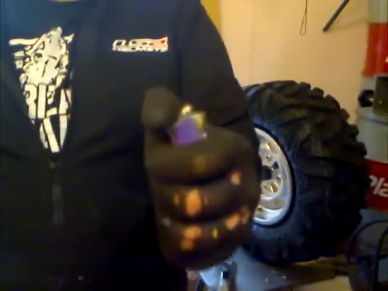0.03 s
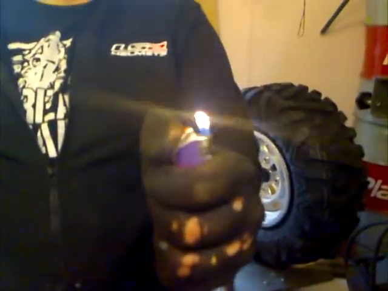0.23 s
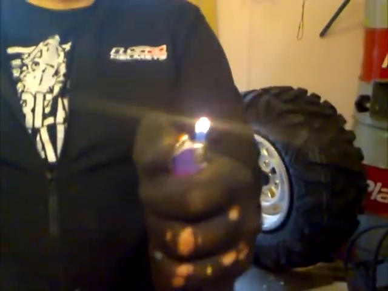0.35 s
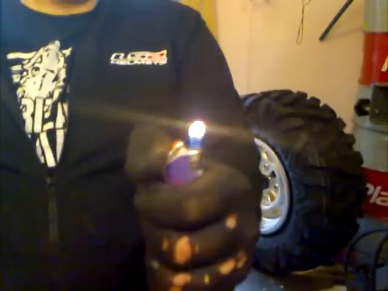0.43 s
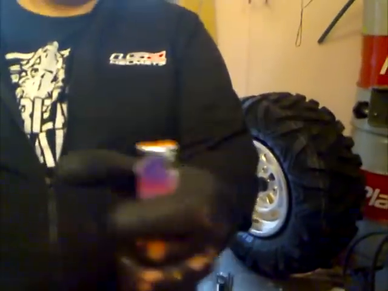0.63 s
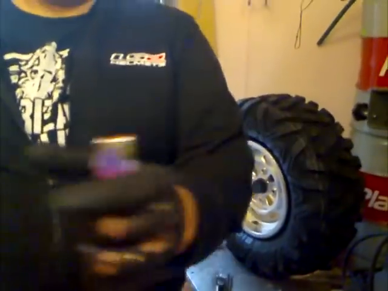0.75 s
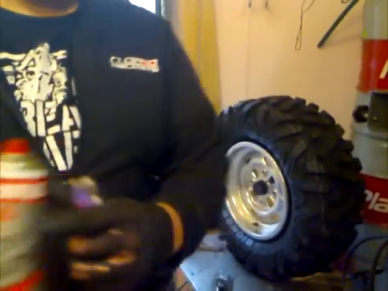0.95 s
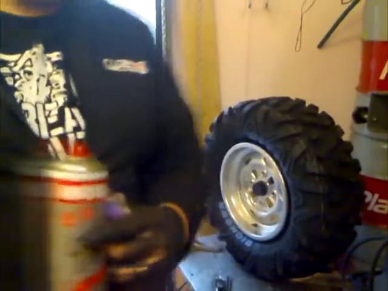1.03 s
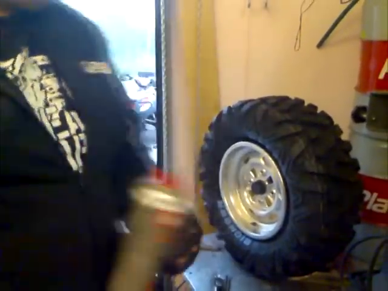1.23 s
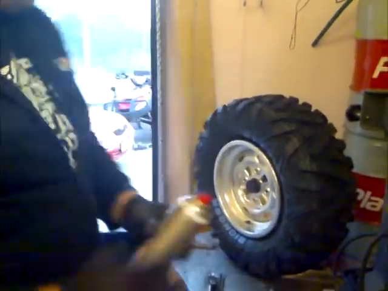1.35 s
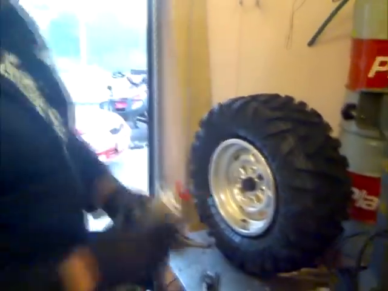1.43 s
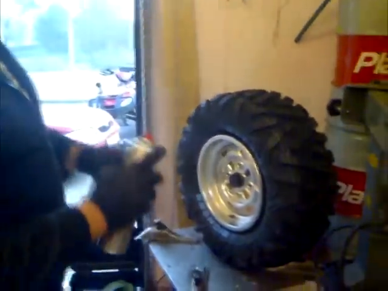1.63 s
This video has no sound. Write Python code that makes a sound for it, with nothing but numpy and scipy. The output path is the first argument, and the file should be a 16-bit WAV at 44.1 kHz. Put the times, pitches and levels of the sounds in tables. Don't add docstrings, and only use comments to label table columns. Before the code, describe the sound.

Two harsh metallic lighter snaps ring in a hard room, followed by a light can tap

```python
import sys
import numpy as np
from scipy import signal
from scipy.fft import rfft, irfft, next_fast_len
from scipy.io import wavfile
from scipy.ndimage import uniform_filter1d

SR = 44100
rng = np.random.default_rng(int(sys.argv[2]) if len(sys.argv) > 2 else 0)


def volts(x):
    e = np.asarray(x, float) / 20
    return 10 ** e


def pcm_store(signal):
    levels = np.round(np.clip(np.atleast_2d(signal), -1, 1) * 32767)
    wavfile.write(sys.argv[1], SR, levels.astype(np.int16).T)


N = 74970


def unit(x):
    return x / np.sqrt(np.mean(x ** 2) + 1e-20)


def along(points, hz):
    point_hz, value = np.transpose(points)
    return np.interp(np.log(hz + 1), np.log(point_hz + 1), value)


def filtered(x, gain):
    size = 2 * next_fast_len(N // 2 + 4096)
    cepstrum = irfft(np.log(np.abs(gain(np.fft.rfftfreq(size, 1 / SR))) + 1e-6), size)
    cepstrum[1:size // 2] *= 2
    cepstrum[size // 2 + 1:] = 0
    return irfft(rfft(x, size) * np.exp(rfft(cepstrum)), size)[:N]


def peaks(modes, hz):
    power = 0
    for center, width, db in modes:
        damping = (hz * width) ** 2
        power = power + volts(2 * db) * damping / ((center * center - hz * hz) ** 2 + damping)
    return np.sqrt(power)


def even(gain):
    return lambda hz: unit(gain(hz))


def bursts(rows, rise_s):
    t = np.arange(N) / SR
    shape = np.zeros(N)
    for start, db, t60 in rows:
        age = np.clip(t - start, 0, None)
        shape += volts(db - 60 * age / abs(t60)) * (1 - np.exp(-age / rise_s))
    return shape * rng.standard_normal(N)


# frequency_hz, t60_s
ROOM_DECAY = [(200, 3.6), (1000, 1.0), (2500, 0.5), (3900, 0.43), (5000, 0.47), (7000, 0.41), (10000, .35),
              (15000, 0.35)]


def echo():
    hz, t, z = signal.stft(rng.standard_normal(SR + SR // 2), SR, nperseg=256)
    fall_db = -60 * t / along(ROOM_DECAY, hz)[:, None]
    decay = volts(fall_db) + volts(-29 + fall_db / 2.64)
    tail = signal.istft(z * decay, SR, nperseg=256)[1]
    tail = tail * (1 - np.exp(-np.arange(len(tail)) / SR / 0.0022))
    return tail / np.linalg.norm(tail)


def room(x, wet_db):
    return x + volts(wet_db) * signal.fftconvolve(x, echo())[:N]


# time_s, rumble_level_db
GATE_LEVEL = [(0.0, -43.5), (0.052, -41), (0.17, -42), (0.198, -45.5), (0.226, -36), (0.288, -25.5),
              (0.516, -39), (0.658, -31.5), (0.724, -36.5), (1.116, -55.5), (1.13, -38.5), (1.182, -43.5),
              (1.372, -53), (1.7, -56.5)]
# frequency_hz, density_db_per_hz
RUMBLE_TONE = [(20, -44.5), (38, -26), (52, -5.5), (120, -1.5), (240, -1.5), (400, -15.5), (700, -30.5),
               (1500, -120)]
# frequency_hz, width_hz, level_db
DRONE_MODES = [(55.5, 4, -1), (133.9, 9, -1), (257.6, 17, -5.5), (524, 31, -7), (878, 47, -5),
               (1125, 71, -6.5), (1642, 45, -6)]
# frequency_hz, density_db_per_hz
AIR_TONE = [(250, -22), (500, -8), (950, -7), (1950, -10.5), (2450, -20), (4200, -21.5), (6500, -31.5),
            (14000, -29)]


def workshop():
    air_db, drone_db, air_follows = 5.5, 4, 0.84
    time, db = np.transpose(GATE_LEVEL)
    level_db = np.interp(np.arange(N) / SR, time, db)

    def noise(gain):
        return unit(filtered(rng.standard_normal(N), gain))

    rumble = noise(lambda hz: volts(along(RUMBLE_TONE, hz)))
    drone = noise(lambda hz: peaks(DRONE_MODES, hz) ** 2)
    air = noise(lambda hz: volts(along(AIR_TONE, hz)))
    low = rumble + volts(drone_db) * drone
    air_level_db = air_db + db.min() + air_follows * (level_db - db.min())
    return volts(level_db - 3) * low + volts(air_level_db) * air


# start_s, level_db, length_s
SCRAPES = [
    (.06, -53, 0.017),
    (1.013, -36, 0.0077),
    (1.04, -52.5, 0.018),
    (1.575, -57, 0.016),
]
# frequency_hz, level_db
SCRAPE_TONE = [(1500, -35), (3000, 4.5), (4000, 7.5), (7000, -5.5), (12000, -10.5), (15000, -11.5)]


def gloves():
    rows = [(start, db + 3.5, 3 * length) for start, db, length in SCRAPES]
    scrape = filtered(bursts(rows, rise_s=.002), even(lambda hz: volts(along(SCRAPE_TONE, hz))))
    return room(scrape, wet_db=-2.5)


def lighter(contacts, tone, modes, wall_tone, wall_modes, wet_db):
    def ringing(points, resonances):
        return even(lambda hz: volts(along(points, hz)) * (1 + volts(-1.5) * peaks(resonances, hz)))

    rows = [(start, db + 1.5, 2 * ring) for start, db, ring in contacts]
    near = filtered(bursts(rows, rise_s=0.00029), ringing(tone, modes))
    first_blow = max(contacts[:3], key=lambda row: row[1])[0]
    answer = np.pad(echo(), (round(first_blow * SR), N))[:N]
    return near + volts(wet_db) * np.sqrt(SR / 20) * filtered(answer, ringing(wall_tone, wall_modes))


# start_s, level_db, ring_s
STRIKE_CONTACTS = [
    (.2250, -18.5, 0.0093),
    (.2275, 8, 0.0043),
    (.2303, 0, 0.0072),
    (.2325, -6, .003),
    (.2358, -5, 0.0031),
    (.2398, -0.5, 0.0041),
    (.2445, 9, 0.0037),
    (.2486, -12, 0.008),
    (.2548, -8.5, 0.0049),
]
# frequency_hz, density_db_per_hz
STRIKE_BODY = [(180, -55), (300, -12), (546, -17.5), (1340, -21.5), (1660, -11.5), (2480, -21.5),
               (3640, -1.5), (4370, -7.5), (16000, -23)]
# frequency_hz, width_hz, level_db
STRIKE_MODES = [(1700, 150, -2), (3870, 250, -10), (4440, 250, 1.5), (4850, 300, -6), (5400, 400, 2),
                (9300, 600, -2)]
# frequency_hz, density_db_per_hz
STRIKE_WALLS = [(500, -25.5), (900, -23.5), (1800, -11), (2730, -15.5), (3700, -7.5), (4400, -5.5),
                (7000, -9), (15500, -29)]
# frequency_hz, width_hz, level_db
STRIKE_WALL_MODES = [(1700, 150, -0.5), (4300, 160, 8.5), (4830, 360, 1.5), (5400, 460, 3.5),
                     (6500, 250, -4), (9050, 500, 4.5)]


def strike():
    return lighter(STRIKE_CONTACTS, STRIKE_BODY, STRIKE_MODES, STRIKE_WALLS, STRIKE_WALL_MODES, wet_db=-7.5)


# start_s, level_db, t60_s, top_hz
BARE_CONTACTS = [
    (.2254, -17, 0.006, 1515),
    (0.228, 9.5, 0.0087, 14000),
    (.5828, 0.5, 0.01, 8970),
    (0.5831, -16, 0.0059, 1800),
]


def cracks():
    total = np.zeros(N)
    for start, db, t60, top_hz in BARE_CONTACTS:
        dull = even(lambda hz: hz / (hz + 400) / (1 + (hz / top_hz) ** 4))
        total += filtered(bursts([(start, db, t60)], rise_s=0.00027), dull)
    return total


# start_s, level_db, ring_s
SNAP_CONTACTS = [
    (.5742, -26, .004),
    (.5805, -22, .006),
    (.5826, 2, .004),
    (.5858, 2, .003),
    (.5872, 3, .0045),
    (.5908, 0, .004),
    (.5930, 2, .005),
    (.5953, -2, .004),
    (.604, -5, .0008),
    (.6123, -7, .0008),
]
# frequency_hz, density_db_per_hz
SNAP_BODY = [(180, -42), (300, -9.5), (1120, -6), (1340, -22.5), (1780, -2.5), (2700, -20), (3760, -3),
             (6960, -8), (16000, -13.5)]
# frequency_hz, width_hz, level_db
SNAP_MODES = [(1800, 200, 4), (3860, 400, 0), (5500, 400, 6), (6700, 600, 14.5), (9200, 600, 2),
              (10680, 30, 7)]
# frequency_hz, density_db_per_hz
SNAP_WALLS = [(500, -27.5), (900, -9.5), (1750, -18.5), (2950, -17.5), (3500, -9.5), (4800, -10),
              (6850, -6), (15500, -19.5)]
# frequency_hz, width_hz, level_db
SNAP_WALL_MODES = [(1740, 170, 11.5), (3947, 430, 13.5), (4200, 200, -8), (6400, 550, 3.5), (8700, 500, -4)]


def snap():
    return lighter(SNAP_CONTACTS, SNAP_BODY, SNAP_MODES, SNAP_WALLS, SNAP_WALL_MODES, wet_db=-11.5)


# start_s, pitch_hz, level_db, t60_s
CAP_NOTE = (-3.3, 10679, -30, 0.4)


def cap():
    start, pitch_hz, db, t60 = CAP_NOTE
    age = np.clip(np.arange(N) / SR - start, 0, None)
    return volts(db - 60 * age / t60) * np.sin(2 * np.pi * pitch_hz * age)


# start_s, level_db, crack_over_ring_db
CAN_TAPS = [
    (1.1287, -29, 2),
    (1.1305, -9, 3),
    (1.1352, -28, 12),
    (1.197, -42, 2),
    (1.216, -46, 8),
    (1.2958, -46, 2),
    (1.3881, -42, -3),
]
# pitch_hz, level_db, t60_s
CAN_MODES = [(896, -24, .3), (1071, -4, .1), (2752, -4, .065), (2790, -27, .2), (3216, -20, .03),
             (3900, -20, .03), (4656, -11, .03), (4908, -14, .03), (5057, -6, .04), (5165, -23, .4),
             (5105, -28, .3), (5520, -10, .015), (7800, -26, .04)]
# frequency_hz, level_db
CRACK_TONE = [(500, -39), (1000, -24), (2300, -12.5), (4200, -10), (5100, 4), (6100, -20), (8300, -22),
              (12000, -37.5)]


def can():
    wall = np.zeros(N + SR)
    t = np.arange(SR // 3) / SR
    for start, db, _ in CAN_TAPS:
        ring = np.zeros(len(t))
        for pitch_hz, level, t60 in CAN_MODES:
            decay = volts(level + rng.normal(0, 1.0) - 60 * t / t60)
            ring += decay * np.sin(2 * np.pi * (pitch_hz * t + rng.random()))
        wall[round(start * SR):][:len(t)] += volts(db - 6) * ring * (1 - np.exp(-t / .0003))
    rows = [(start, db + over, .011) for start, db, over in CAN_TAPS]
    crack = filtered(bursts(rows, rise_s=0.000305), even(lambda hz: volts(along(CRACK_TONE, hz))))
    return room(wall[:N] + crack, wet_db=-16)


def scene():
    x = workshop() + gloves() + strike() + cracks() + snap() + cap() + can()
    return np.array([x, x])


# center_s, half_length_s, above_hz
TREBLE_DROPS = [
    (.2190, .0030, 3500),
    (.5778, .0018, 4500),
    (1.120, .006, 7500),
]


def moving_treble(x):
    hz, t, z = signal.stft(x, SR, nperseg=1024)
    at = np.minimum((t * SR).astype(int), N - 1)
    level_db = 10 * np.log10(uniform_filter1d(x ** 2, 2048)[at] + 1e-9)
    step_hz = 800
    wanted_hz = 12650 + 82 * (level_db + 50)
    top_hz = 12800 + step_hz * np.round((wanted_hz - 12800) / step_hz)
    x = signal.istft(z * (hz[:, None] < top_hz), SR, nperseg=1024)[1][:N]
    for center, half, above_hz in TREBLE_DROPS:
        highpass = signal.butter(6, above_hz, "high", fs=SR, output="sos")
        treble = signal.sosfiltfilt(highpass, x)
        x = x - treble * np.exp(-((np.arange(N) / SR - center) / half) ** 4)
    return x


def low_pass(x):
    return signal.sosfilt(signal.butter(12, 16520, fs=SR, output="sos"), x)


def record(dry):
    ceiling, knee = 1, 2.6
    clipped = dry[0] / (1 + np.abs(dry[0] / ceiling) ** knee) ** (1 / knee)
    x = moving_treble(clipped)
    overload = x ** 2 * rng.standard_normal(N)
    trace = volts(-24) * filtered(overload, lambda hz: peaks([(4000, 2000, 0)], hz))
    return low_pass(np.array([x + trace, x - trace]))


dry = scene()
out = record(dry)
pcm_store(out)
```